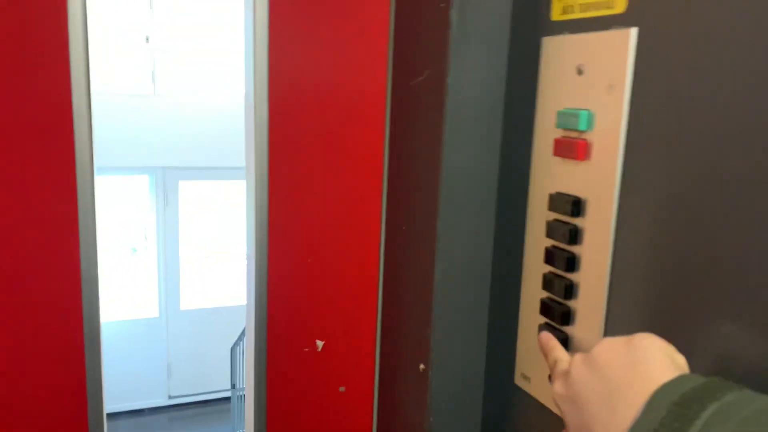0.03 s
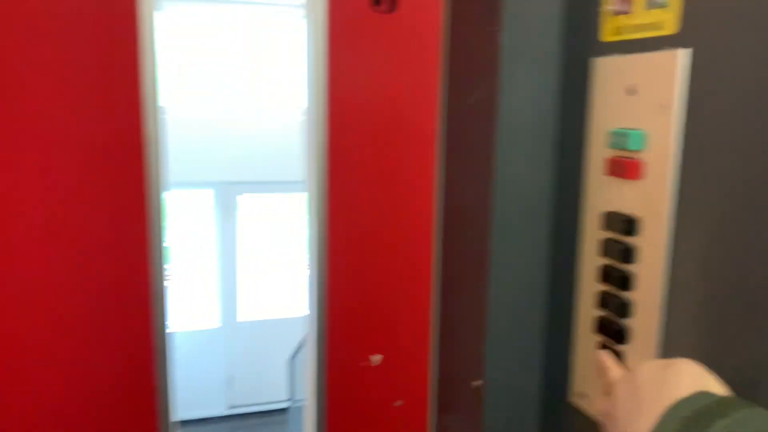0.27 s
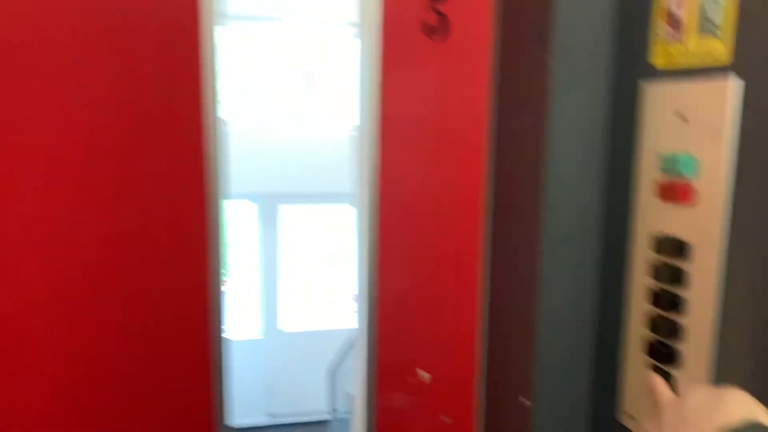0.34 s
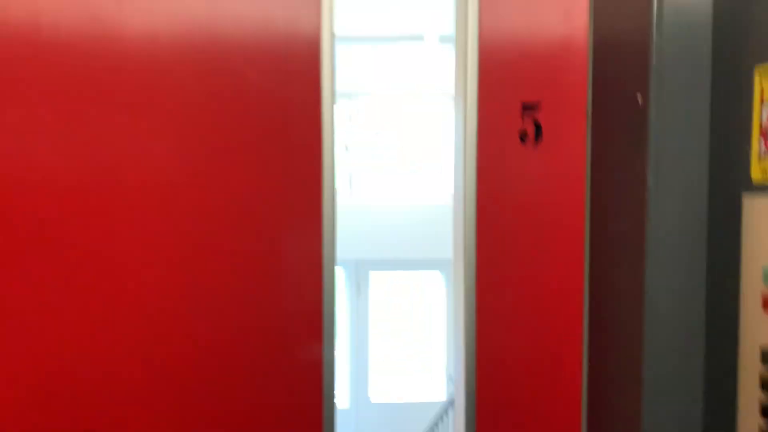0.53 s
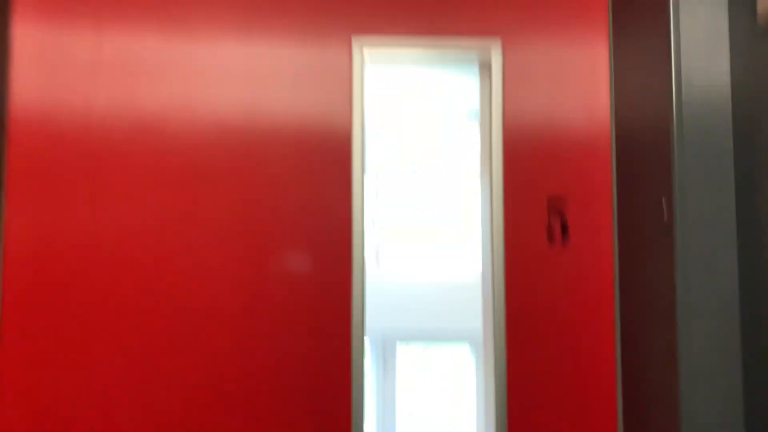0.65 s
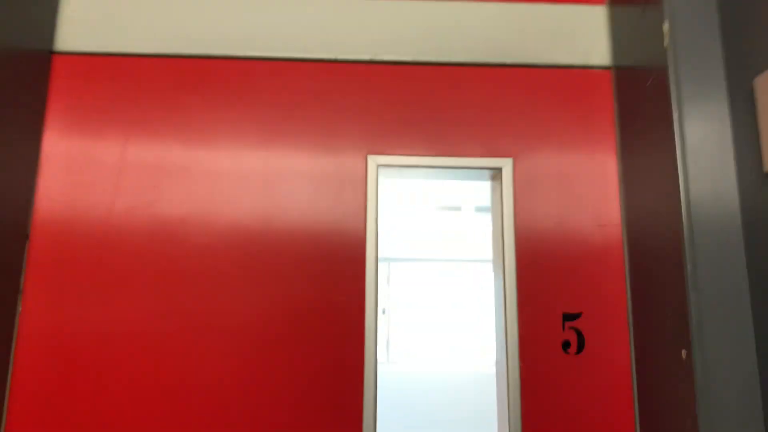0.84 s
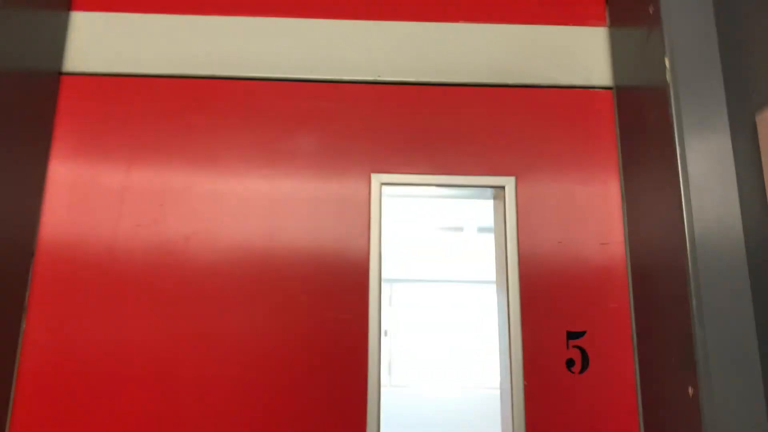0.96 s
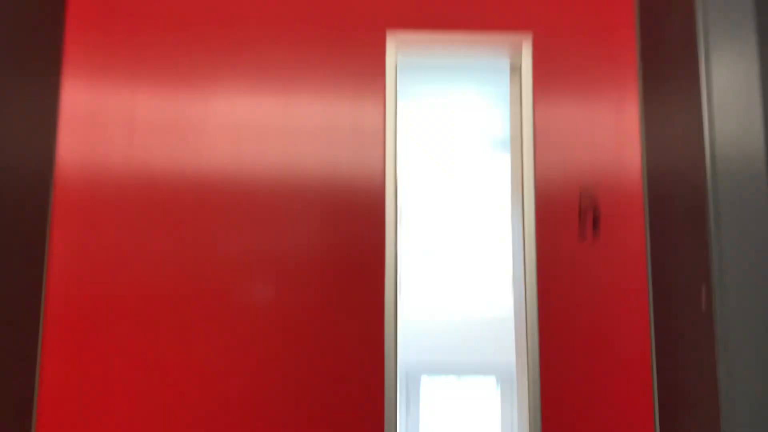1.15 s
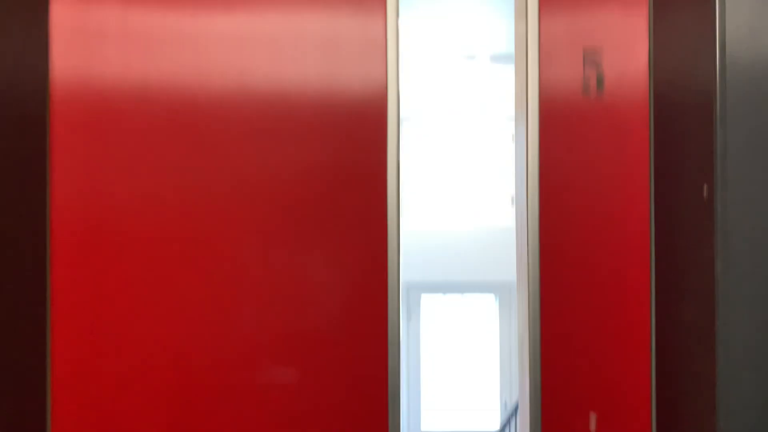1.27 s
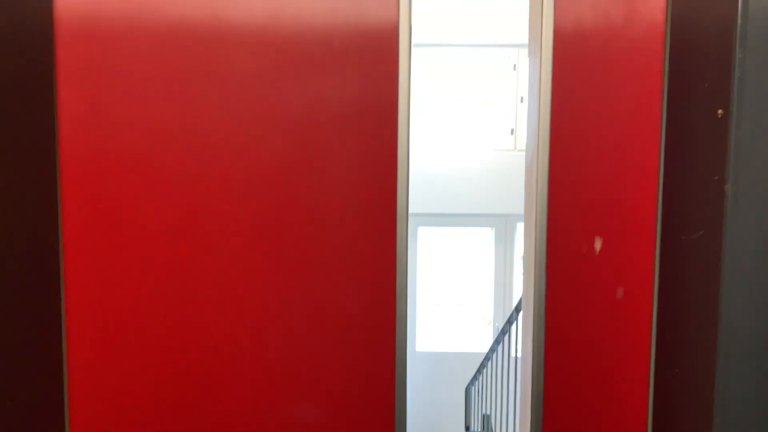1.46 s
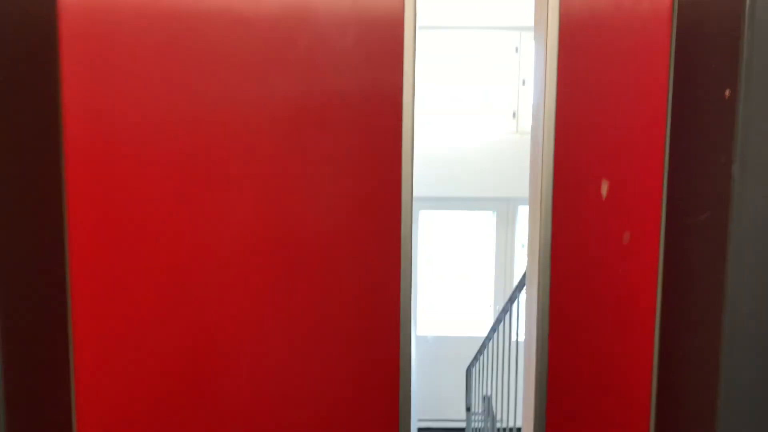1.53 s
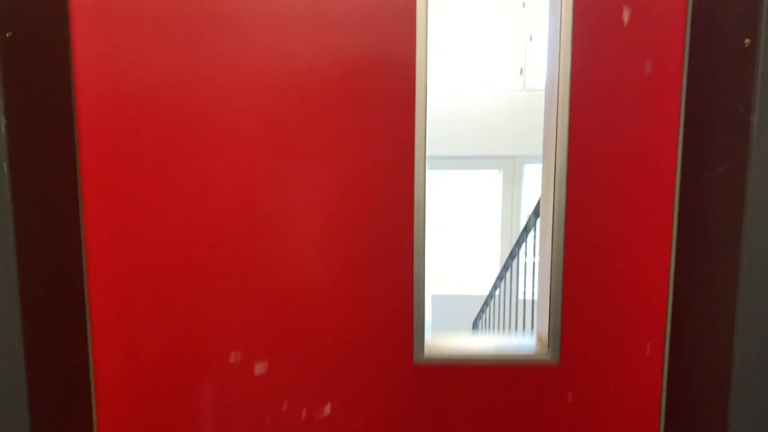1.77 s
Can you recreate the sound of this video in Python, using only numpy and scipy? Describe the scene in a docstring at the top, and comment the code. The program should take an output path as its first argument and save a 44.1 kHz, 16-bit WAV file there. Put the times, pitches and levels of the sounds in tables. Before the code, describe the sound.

An old elevator sets off, heard from inside near the door. A button clicks at the start, and at 0.2 seconds the lock clacks loudly as the car jolts with a low boom. A smaller clack follows at 0.4. A faint, thin squeal runs from 0.5 to 0.8. From 0.6 a motor hum swells and fades over quieter rumble and light sliding hiss, with soft knocks, until about 1.8.

```python
"""Old elevator setting off

Inside a small old car, on a stereo pair close to the door. A floor button clicks, the lock and brake
clack, and the car jolts into motion with a thin squeal. Its panels boom and settle; the motor hum
swells and fades over a low rumble and the hiss of the guide shoes."""
import sys
import numpy as np
from scipy import signal
from scipy.fft import rfft, irfft
from scipy.io import wavfile

SR = 44100
rng = np.random.default_rng(int(sys.argv[2]) if len(sys.argv) > 2 else 0)


def store_pcm(level_fs):
    """Save levels as 16-bit WAV."""
    pcm = np.round(np.clip(level_fs, -1, 1) * 32767).astype(np.int16)
    wavfile.write(sys.argv[1], SR, np.atleast_2d(pcm).T)


N = 79380
T, F = np.arange(N) / SR, np.fft.rfftfreq(N, 1 / SR)
LEFT_DB = 1.5  # bolt, cabin, motor and ride sit a little left of centre
# likeness of the two microphones: frequency_hz, correlation
MIC_CORRELATION = [(60, 1), (300, 0.65), (550, 0.42), (2400, -0.18)]


def clacks():
    """Each clack is a crack, ringing metal and dense panel reflections, with a faint shaft tail."""
    # button, lock and brake, then soft knocks on the way:
    # start_s, bass_db, mid_db, treble_db, top_db, left_over_right_db
    hits = [(0.0385, -74.5, -41.5, -28, -34, 0), (0.076, -48, -32, -52, -64, 5),
            (0.136, -45, -35, -40, -46.5, 1), (0.156, -39.5, -45.5, -50, -65.5, 6.5),
            (0.2190, -40.5, -37, -23, -27.5, -1.5), (0.2273, -27, -26, -22, -24.5, -1.5),
            (0.2331, -17, -21, -25, -26, 2), (0.2560, -26, -25, -27.5, -38, 2),
            (0.417, -41, -46, -35, -49, 0.5), (0.4389, -41.5, -26, -26.5, -34.5, -0.5),
            (0.902, -38.5, -46.5, -54.5, -72, 1), (1.4275, -38, -47.5, -67, -90, 6)]
    # where those four band levels apply: frequency_hz
    level_hz = [300, 1000, 3500, 11000]
    # frequency_hz, gain_db
    colour_with_dip = [(200, 3), (310, 10), (480, 7), (700, 3), (2200, 9.5), (3300, 4), (6300, 9.5),
                       (8400, -5), (10500, 10.5), (13500, -5)]
    # decay in the car: frequency_hz, t60_s
    car_decay = [(200, 0.32), (500, 0.31), (1500, 0.24), (8000, 0.25), (15000, 0.32)]
    # modes of the lock metal: pitch_hz, gain_db
    metal_modes = [(508, 2), (1048, 2), (1153, -3), (1782, -2), (2239, -1), (2675, 0), (3580, -3),
                   (3992, -3), (5640, -2)]
    ripple_db, ripple_step_hz, low_cut_hz = 4.8, 22, 190
    rise_cycles, crack_decay_s, shaft_t60_s, metal_t60_s = 1.41, .0022, .69, .24

    # panel resonances ripple the spectrum at each microphone, less so in the bass
    grid = np.arange(0, SR / 2, ripple_step_hz)
    ripples = rng.standard_normal((2, len(grid)))
    panels = np.array([unit(amp(ripple_db * np.interp(F, grid, row))) for row in ripples])
    panels **= 1 - np.clip(over_hz(MIC_CORRELATION, F), 0, 1)
    pink = np.sqrt(SR / 4 / (F + 1))
    colour = amp(over_hz(colour_with_dip, F)) * pink / np.sqrt(1 + (low_cut_hz / (F + 1)) ** 8)

    # each band rises and dies at its own pace
    centres = np.geomspace(150, 15000, 9)
    bands = [np.interp(np.log(F + 1), np.log(centres), row) for row in np.eye(len(centres))]
    shaft = amp(-30.5 - 60 * T / shaft_t60_s)
    envelopes = []
    for hz in centres:
        rise = 1 - np.exp(-T * hz / rise_cycles)
        reflections = amp(-60 * T / over_hz(car_decay, hz))
        crack = amp(5) * np.sqrt(hz / level_hz[-1]) * np.exp(-T / crack_decay_s)
        envelopes.append(rise * (reflections + crack + shaft))

    out, t = np.zeros((2, N)), T[:SR // 2]
    for start, *levels, side_db in hits:
        strength = list(zip(level_hz, levels))
        spectrum = mic_pair() * panels * colour * amp(over_hz(strength, F))
        burst = sum(irfft(spectrum * band, N) * envelope for band, envelope in zip(bands, envelopes))
        add(out, start, pan(side_db) * burst)
        for hz, db in metal_modes:
            ring = np.sin(2 * np.pi * (hz * t + rng.random((2, 1))))
            ring_db = db - 8.5 + over_hz(strength, hz) - 60 * t / metal_t60_s
            add(out, start, pan(side_db) * ring * amp(ring_db))
    return out


def bolt():
    """The lock bolt chatters home: each hard strike swells and dies within a few cycles."""
    # strikes of the bolt: start_s, pitch_hz, level_db
    strikes = [(0.2219, 2600, -11.5), (0.2262, 2680, -7.5), (0.2285, 1850, -11), (0.2305, 410, -11),
               (0.2333, 2500, -10)]
    rise_cycles = 2.2
    out = np.zeros((2, N))
    for start, hz, db in strikes:
        age = T * hz / rise_cycles
        ring = np.sin(2 * np.pi * (hz * T + .5 * rng.random((2, 1))))
        add(out, start, pan(LEFT_DB) * amp(db) * age * np.exp(1 - age) * ring)
    return out


def cabin():
    """Soft, heavy jolts set the cabin's low modes booming."""
    # jolts of the car: start_s, level_db, rise_s
    jolts = [(0.155, -19.5, 0.061), (0.262, -10.5, 0.026), (0.537, -28, 0.015)]
    # modes of the cabin: pitch_hz, gain_db, t60_s
    modes = [(49.1, -10.5, 0.99), (91.86, 0.5, 0.76), (140.5, -5.5, 0.17), (210.9, -12.5, 0.5),
             (237, -16.5, 1), (291.2, -16, 1)]
    boom = np.sqrt(2) * sum(amp(db - 60 * T / t60) * np.sin(2 * np.pi * hz * T) for hz, db, t60 in modes)
    out = np.zeros((2, N))
    for start, db, rise in jolts:
        add(out, start, boom * amp(db) * np.minimum(T / rise, 1))
    return out


def motor():
    """A nearly clean hum with weaker, unsteady partials and whines, and the cabin's drone below."""
    # swells of the hum: time_s, level_db
    hum_level = [(0.3, -55), (0.588, -42), (0.601, -26.5), (0.74, -31.5), (0.8, -41.5), (0.9, -36.5),
                 (0.95, -29), (1.03, -33), (1.13, -39), (1.25, -27.5), (1.34, -38.5), (1.46, -42),
                 (1.525, -55), (1.57, -41), (1.62, -39), (1.665, -50), (1.71, -41), (1.8, -47)]
    # drift of the hum: time_s, pitch_hz
    hum_pitch = [(0.6, 298.3), (1.15, 292), (1.8, 298.7)]
    # partials of the drive: pitch_ratio, level_db, share_of_swell
    partials = [(0.789, -57, 0.9), (1.18, -47, 0.6)]
    # whines of the drive that come and go: start_s, end_s, pitch_hz, level_db
    whines = [(.92, 1.06, 697, -52), (1.1, 1.44, 688, -55.5), (1.58, 1.9, 426, -51)]
    # surges of the drone: time_s, level_db
    drone_level = [(0.6, -42), (1.0, -37), (1.15, -51), (1.5, -33.5), (1.57, -43.5), (1.66, -27),
                   (1.72, -57), (1.78, -27)]
    usual_hum_db, whine_fade_s, drone_hz, fade_in_s = -33, .06, 88, .3
    hz, db = over_time(hum_pitch), over_time(hum_level)
    out = amp(db + 1.1 * wander(20)) * tone(hz, waver=.006, rate_hz=15.2)
    for ratio, level_db, share in partials:
        partial = tone(ratio * hz, waver=.011, rate_hz=30)
        out += amp(level_db + share * (db - usual_hum_db)) * partial * (1 + .5 * wander(23))
    for start, end, whine_hz, level_db in whines:
        gate = np.clip(np.minimum(T - start, end - T) / whine_fade_s, 0, 1)
        out += gate * amp(level_db + 2 * wander(10)) * tone(whine_hz, waver=.011, rate_hz=10)
    drone = tone(drone_hz, waver=.031, rate_hz=9)
    out += amp(over_time(drone_level)) * drone * (1 + .3 * wander(4))
    return out * np.clip(T / fade_in_s, 0, 1) ** 2


def ride():
    """The car rumbles, and its guide shoes slide along the rails with one brief scuff."""
    # colour of the rumble: frequency_hz, density_db
    rumble_spectrum = [(22, -30.5), (45, 0.5), (89, -4), (112, -11), (180, -21.5), (420, -19),
                       (1200, -67.5)]
    # course of the rumble: time_s, level_db
    rumble_level = [(0, -56), (0.12, -40), (0.3, -18.5), (0.6, -24), (0.8, -37), (1.8, -41.5)]
    # frequency_hz, density_db
    hiss_with_dip = [(100, -21.5), (380, -10.5), (600, 4.5), (950, -4), (2300, -6), (4000, -16),
                     (6500, -20.5), (8500, -39.5), (11000, -28), (16000, -60)]
    # course of the sliding: time_s, level_db
    slide_level = [(0, -53), (0.17, -42), (0.57, -37), (0.83, -48), (1.04, -54), (1.17, -49.5), (1.55, -55),
                   (1.8, -53)]
    scuff_at_s, scuff_width_s, scuff_hz, scuff_db = .935, .024, 5500, -56
    rumble = noise(amp(over_hz(rumble_spectrum, F))) * amp(over_time(rumble_level))
    slide = noise(amp(over_hz(hiss_with_dip, F))) * amp(over_time(slide_level) + .45 * wander(40))
    scuff = noise(hump(scuff_hz) / np.sqrt(F + 1)) * amp(scuff_db)
    return rumble + slide + scuff * np.exp(-((T - scuff_at_s) / scuff_width_s) ** 2)


def squeal():
    """A thin, rough squeal of metal that fades as the car gets under way."""
    start_s, end_s, pitch_hz, level_db, fade_db = .53, .79, 4320, -48.5, -13
    progress = np.clip((T - start_s) / (end_s - start_s), 0, 1)
    gate = np.minimum(10 * np.minimum(progress, 1 - progress), 1)
    rough_tone = np.array([tone(pitch_hz, waver=.005, rate_hz=228) for _ in range(2)])
    return gate * amp(level_db + fade_db * progress) * rough_tone


def ticks():
    """Small dry ticks close to the microphones, too light to ring the car."""
    # ticks during the ride: start_s, level_db
    hits = [(1.581, -51), (1.590, -50), (1.616, -45)]
    centre_hz, decay_s = 1200, .002
    out = np.zeros((2, N))
    for start, db in hits:
        add(out, start, noise(hump(centre_hz)) * amp(db) * np.exp(-T / decay_s))
    return out


def amp(db):
    """Decibels to gain."""
    return 10 ** (np.asarray(db) / 20)


def unit(x):
    """Scales to rms 1."""
    return x / np.sqrt(np.mean(x ** 2) + 1e-20)


def over_hz(points, hz):
    """Reads a table on a log-frequency axis."""
    f, value = np.transpose(points)
    return np.interp(np.log(hz + 1), np.log(f + 1), value)


def over_time(points):
    """Reads a curve at every sample."""
    return np.interp(T, *np.transpose(points))


def pan(db):
    """Left and right gains, the left louder by db."""
    return amp([[db / 2], [-db / 2]])


def add(mix, start_s, sound):
    """Mixes a sound in at start_s."""
    part = mix[:, max(round(start_s * SR), 0):][:, :sound.shape[-1]]
    part += sound[..., :part.shape[1]]


def wander(rate_hz):
    """Smooth random drift of rms 1."""
    return unit(irfft(rfft(rng.standard_normal(N)) * np.exp(-(F / rate_hz) ** 2), N))


def tone(hz, waver, rate_hz):
    """A sine of rms 1 whose pitch wanders by the fraction waver."""
    pitch = hz * (1 + waver * wander(rate_hz))
    return np.sqrt(2) * np.sin(2 * np.pi * np.cumsum(pitch) / SR)


def mic_pair():
    """Spectra of white noise at two microphones, alike in the bass."""
    a, b = rfft(rng.standard_normal((2, N)))
    correlation = np.clip(over_hz(MIC_CORRELATION, F), -1, 1)
    mid, side = a * np.sqrt((1 + correlation) / 2), b * np.sqrt((1 - correlation) / 2)
    return np.array([mid + side, mid - side])


def noise(gain):
    """Stereo noise of rms 1 with the given spectrum."""
    return unit(irfft(mic_pair() * gain, N))


def hump(hz):
    """A broad spectral hump, about two octaves wide."""
    return np.exp(-np.log2((F + 1) / hz) ** 2 / 2)


def scene():
    """Everything heard in the car."""
    return clacks() + bolt() + ticks() + squeal() + pan(LEFT_DB) * (cabin() + motor() + ride())


def record(dry):
    """The recorder cuts the treble above 16.2 kHz."""
    low_pass = signal.firwin(511, 16200, window=("kaiser", 9), fs=SR)
    return signal.oaconvolve(dry, low_pass[None], "same")


dry = scene()
out = record(dry)
store_pcm(out)
```